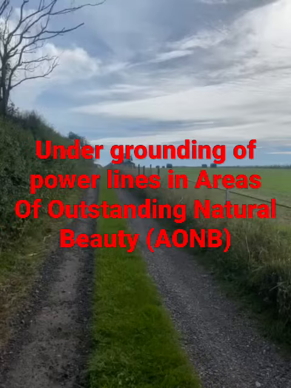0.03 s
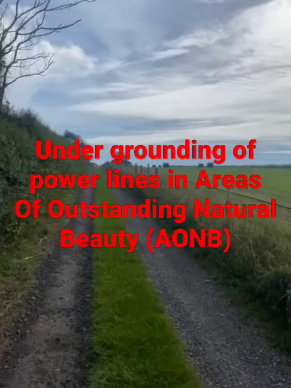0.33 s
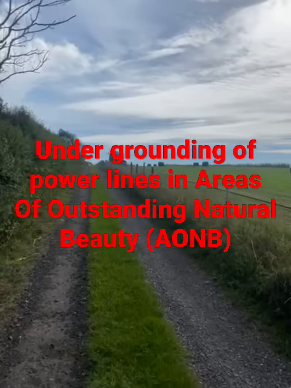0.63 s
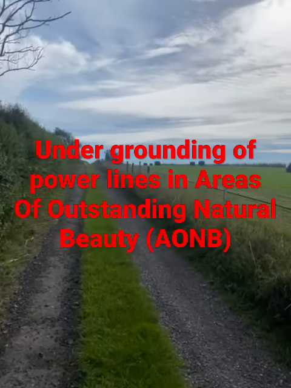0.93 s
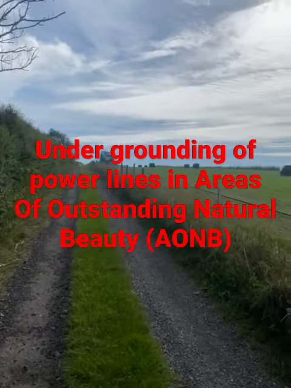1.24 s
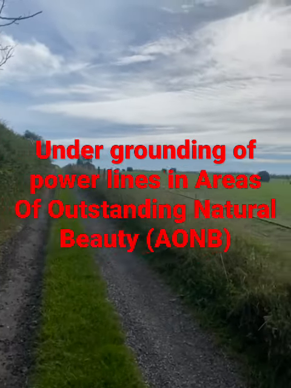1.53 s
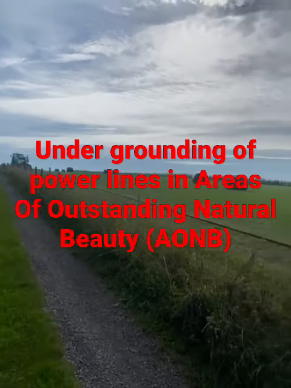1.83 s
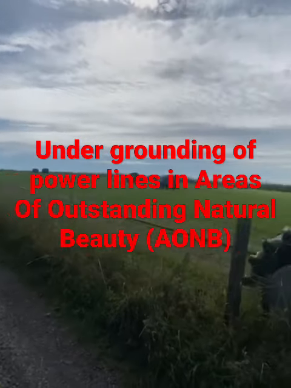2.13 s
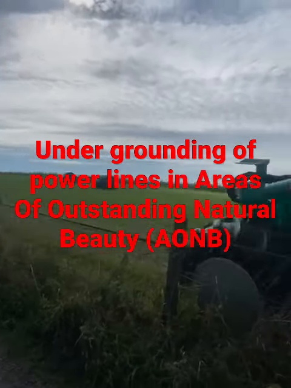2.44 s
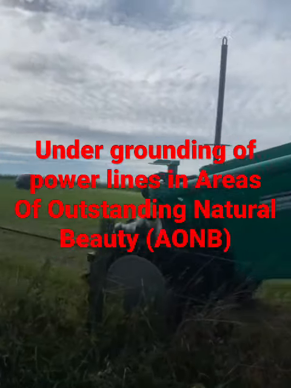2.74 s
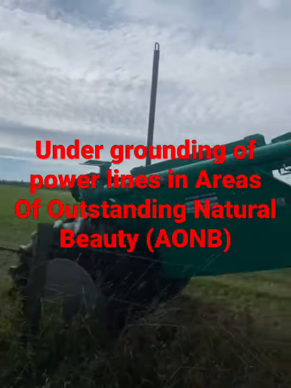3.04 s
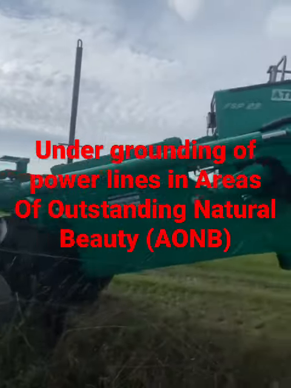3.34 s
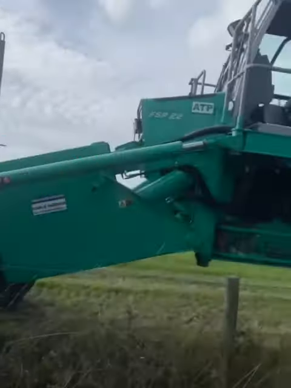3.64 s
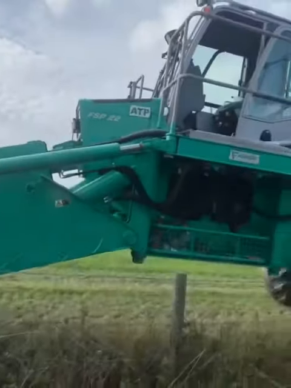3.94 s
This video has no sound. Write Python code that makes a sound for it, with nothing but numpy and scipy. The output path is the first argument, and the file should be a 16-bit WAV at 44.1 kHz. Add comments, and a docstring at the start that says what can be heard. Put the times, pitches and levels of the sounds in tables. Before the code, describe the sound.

A big diesel engine drones at constant speed in open farmland, its fan roaring and whining over faint wind. Two tiny ticks sound close by, then the engine becomes boomier and duller, with a fast rasp coming through.

```python
"""Beside a farm track, a big diesel machine runs at a steady speed.
Its exhaust drones on the shaft orders and puffs at each firing; fan air roars in its housing; tones whine.
As the microphone turns towards it the roar dulls, the boom grows and a fast-turning part rasps through.
Two small ticks sound nearby, and faint wind lies underneath."""
import sys
import numpy as np
from scipy.fft import rfft, irfft, next_fast_len
from scipy.io import wavfile
from scipy.ndimage import map_coordinates

SR = 44100
rng = np.random.default_rng(int(sys.argv[2]) if len(sys.argv) > 2 else 0)


def wrap_up_sound(samples):
    """Save the sound to the file named by the first command line argument, as 16-bit audio."""
    columns = np.atleast_2d(samples).T
    # keep every value between -1 and 1, then stretch to whole-number steps
    tamed = np.clip(columns, -1, 1)
    steps = np.round(tamed * 32767).astype(np.int16)
    wavfile.write(sys.argv[1], SR, steps)


N = 176400
T = np.arange(N) / SR

# exhaust lines: shaft order, level/dB, gain when facing/dB, waver/dB
EXHAUST_ORDERS = [(3, -31, -1.2, 0.5), (4.5, -33, -2, 1.5), (6, -34.5, 6, 0.8), (9, -40, -7, 4),
                  (12, -37, 10, 1.5)]
# exhaust directness: t/s, facing/0-1
FACING = [(1.9, 0.02), (2.2, 0.93), (2.95, 0.9), (3.2, 0.74), (3.5, 0.55), (3.75, 0.98), (4, 0.7)]
# rumble envelope: t/s, level/dB
RUMBLE_LEVEL = [(0, -24.5), (.5, -23.5), (1.1, -25.2), (1.7, -24.8), (2.4, -24), (3, -23.5), (3.3, -23.5),
                (3.6, -25.8), (4, -20.5)]
# rumble spectrum: f/Hz, level/dB
RUMBLE_SPECTRUM = [(35, -43), (55, -15.5), (80, -8), (120, -2.5), (155, -6.5), (195, -5), (212, 0),
                   (255, -0.5), (285, -4), (315, -9.5), (400, -7), (480, -26), (900, -47.5)]
def exhaust(shaft_hz=23.17, drift=0.0019, firings_per_turn=3, puff_depth=0.26):
    """Engine orders drone over a rumble that swells at each firing."""
    turns = np.cumsum(shaft_hz * (1 + drift * wobble(3.01))) / SR
    facing = curve(FACING)
    drone = 0
    for order, db, facing_db, waver_db in EXHAUST_ORDERS:
        rms = amp(db + facing_db * facing + waver_db * wobble(9))
        drone += np.sqrt(2) * rms * np.sin(2 * np.pi * (order * turns + rng.random()))
    puffs = 1 + puff_depth * np.cos(2 * np.pi * firings_per_turn * turns)
    return drone + amp(curve(RUMBLE_LEVEL)) * rush(RUMBLE_SPECTRUM, puffs)


# block envelope: t/s, level/dB
BLOCK_LEVEL = [(0, -27), (.5, -27), (1.1, -24.5), (1.7, -25), (2.2, -23.5), (2.6, -25), (3.1, -23),
               (3.6, -26), (4, -25.5)]
# block spectrum: f/Hz, level/dB
BLOCK_SPECTRUM = [(150, -21), (300, -1), (410, -2), (470, 0.5), (600, 1.5), (850, -4), (1300, -6.5),
                  (2200, -15), (3200, -20.5), (6000, -41)]
def engine_block():
    """The block radiates a low, broad roar."""
    return amp(curve(BLOCK_LEVEL) + 0.13 * wobble(11)) * rush(BLOCK_SPECTRUM)


# fan envelope: t/s, level/dB
FAN_LEVEL = [(0, -29.5), (.45, -25), (.85, -25), (1.15, -23.5), (1.5, -22.5), (1.9, -24.5), (2.2, -22),
             (2.45, -22), (2.8, -25.5), (3.2, -28), (4, -30)]
# fan spectrum: f/Hz, level/dB
FAN_SPECTRUM = [(400, -27), (700, -11.5), (900, -0.5), (1200, 2), (1400, -1.5), (1700, 0), (1900, -2),
                (2150, -3.5), (2500, -8.5), (3200, -16), (5000, -51)]
# housing resonances: f/Hz, width/Hz, lift/dB
HOUSING_MODES = [(1105, 220, 1.5), (1522, 28, 4), (2086, 27, 4.5)]
def fan():
    """Rushing fan air rings in its housing."""
    level = amp(curve(FAN_LEVEL) + 0.47 * wobble(15))
    flicker = amp(0.7 * wobble(120))
    return level * rush(FAN_SPECTRUM, flicker, HOUSING_MODES)


# hum envelope: t/s, level/dB
HUM_LEVEL = [(0, -29), (.85, -29.5), (1.4, -30), (2.15, -28), (2.55, -34.5), (3, -37.5), (3.5, -30),
             (4, -42)]
# lower whine envelope: t/s, level/dB
LOW_WHINE_LEVEL = [(.25, -45), (.47, -31), (.8, -31.5), (1.1, -37), (1.5, -39), (1.75, -31.5),
                   (2.25, -29.5), (2.5, -41), (3.1, -53)]
# upper whine envelope: t/s, level/dB
HIGH_WHINE_LEVEL = [(.1, -46), (.7, -34.5), (1.2, -29.5), (1.5, -35.5), (2, -36), (2.3, -35), (2.55, -41),
                    (2.74, -30), (2.95, -36), (3.3, -45), (4, -41)]
# beamed tones: f/Hz, level/dB, peak t/s, beam sigma/s, off-beam loss/dB, flutter share/0-1
BEAMED_TONES = [(226.4, -23, 3.29, 0.11, 27, 0.3), (381.9, -30.5, 0.23, 1.04, 5.5, 0.23),
                (712, -40, 2.6, 1, 6, 0.25), (762.6, -36.5, 1.4, 1.07, 9, 0.12),
                (897, -37.5, 1.2, 0.72, 13, 0.3), (1040, -36, 1.84, 0.75, 22, 0.74),
                (1516, -38, 1.8, 1.3, 10, 0.57), (1615, -40, 1.6, .9, 16, 0.6),
                (2094, -43, 1.5, 1.2, 14, 0.6)]
def whine():
    """A hum and two whines that take turns; other tones swell as the microphone crosses their beams."""
    out = amp(curve(HUM_LEVEL)) * tone(hz=356.4, flutter_share=0.022)
    out += amp(curve(LOW_WHINE_LEVEL)) * tone(hz=1089, flutter_share=0.088)
    out += amp(curve(HIGH_WHINE_LEVEL)) * tone(hz=1142, flutter_share=0.2)
    for hz, db, peak_s, sigma_s, loss_db, flutter_share in BEAMED_TONES:
        off_beam = 1 - np.exp(-.5 * ((T - peak_s) / sigma_s) ** 2)
        out += amp(db - loss_db * off_beam) * tone(hz, flutter_share)
    return out


def tone(hz, flutter_share, drift=0.00253):
    """A wandering tone at rms 1; a share of its power flutters in the moving air."""
    flutter_hz = 21.93 * (hz / 1000) ** .6
    steady = np.sqrt(2 * (1 - flutter_share))
    flutter = np.sqrt(flutter_share) * (wobble(flutter_hz) + 1j * wobble(flutter_hz))
    cycles = np.cumsum(hz * (1 + drift * wobble(8))) / SR
    return np.real((steady + flutter) * np.exp(2j * np.pi * (cycles + rng.random())))


# hiss envelope: t/s, level/dB
HISS_LEVEL = [(0, -35), (.3, -36.5), (.5, -35.5), (.9, -34.5), (1.15, -36.3), (1.4, -34.5), (1.7, -36),
              (2.15, -33), (2.5, -36), (3, -38), (4, -38.3)]
# hiss spectrum: f/Hz, level/dB
HISS_SPECTRUM = [(1500, -29), (2700, 0), (3300, 0), (4100, 1.5), (5200, -1.5), (6500, -7.5), (8000, -10.5),
                 (9700, -18.5), (11700, -38)]
# top treble envelope: t/s, level/dB
TREBLE_LEVEL = [(0, -52), (1, -48.5), (1.8, -55), (2.3, -44.5), (3, -45), (4, -43.5)]
# top treble spectrum: f/Hz, level/dB
TREBLE_SPECTRUM = [(4000, -10), (6500, 0.5), (8000, -2), (9700, -7), (11300, -8), (12000, -29)]
def hiss():
    """Two bands of hiss flicker above the roar."""
    lower = amp(curve(HISS_LEVEL) + .5 * wobble(13)) * rush(HISS_SPECTRUM)
    upper = amp(curve(TREBLE_LEVEL) + 1.3 * wobble(12)) * rush(TREBLE_SPECTRUM)
    return lower + upper


# rasps in each turn: place/turns, relative level/dB, sigma/turns
RASPS = [(.01, -8, 0.081), (.17, -5, .08), (.41, -8.5, 0.065)]
# clatter envelope: t/s, level/dB
CLATTER_LEVEL = [(0, -70), (1.9, -47), (2.7, -41), (3.3, -38.5), (4, -37)]
# clatter spectrum: f/Hz, level/dB
CLATTER_SPECTRUM = [(1000, -16), (2500, 9.5), (3800, -1), (5200, 2), (7000, -2), (9000, -11),
                    (11700, -13.5)]
def clatter(turn_hz=28.35):
    """A fast-turning part rasps three times a turn, never quite equally."""
    gate = 0
    for place, db, sigma in RASPS:
        offset_turns = (T * turn_hz - place + .5) % 1 - .5
        gate += amp(db) * np.exp(-.5 * (offset_turns / sigma) ** 2)
    unevenness = amp(1.9 * wobble(40))
    return amp(curve(CLATTER_LEVEL)) * rush(CLATTER_SPECTRUM, gate * unevenness)


# snaps, the first two heard as one tick: t/s, level/dB
SNAPS = [(.825, -28), (0.8274, -24.5), (1.931, -22)]
# snap spectrum: f/Hz, level/dB
SNAP_SPECTRUM = [(3000, -25), (7000, -6), (9000, 0), (12000, -1)]
def ticks(snap_decay_s=.0007, scrape_decay_s=.008, scrape_db=-15):
    """Tiny dry snaps close by, each trailing a faint scrape."""
    envelope = 0
    for onset_s, db in SNAPS:
        age_s = np.abs(T - onset_s)
        snap = np.exp(-age_s / snap_decay_s)
        scrape = amp(scrape_db) * np.exp(-age_s / scrape_decay_s)
        envelope += amp(db) * (T >= onset_s) * (snap + scrape)
    return coloured(envelope * rng.standard_normal(N), SNAP_SPECTRUM)


# wind spectrum: f/Hz, level/dB
WIND_SPECTRUM = [(5, -12), (15, -7), (40, -13), (120, 5), (400, -40)]
def wind(level_db=-51, gust_db=2.5):
    """Wind makes a faint low flutter at the microphone."""
    return amp(level_db + gust_db * wobble(4)) * rush(WIND_SPECTRUM)


def amp(db):
    """Decibels to gain."""
    return 10 ** (np.asarray(db) / 20)


def unit(x):
    """x at rms 1."""
    return x / np.sqrt(np.mean(x ** 2) + 1e-20)


def curve(rows):
    """(t/s, value) points joined by straight lines."""
    return np.interp(T, *np.transpose(rows))


def wobble(rate_hz):
    """Smooth random curve at rms 1, rate_hz knots a second."""
    return unit(map_coordinates(rng.standard_normal(2000), [T * rate_hz + 3], mode="wrap"))


def filtered(x, gain):
    """x through a frequency-dependent gain."""
    size = next_fast_len(N + 8192)
    return irfft(rfft(x, size) * gain(np.fft.rfftfreq(size, 1 / SR)), size)[:N]


def coloured(x, spectrum, peaks=()):
    """x through a (f/Hz, level/dB) spectrum with resonant lifts."""
    hz, db = np.transpose(spectrum)

    def gain(f):
        lift_db = sum(lift / (1 + (2 * (f - centre) / width) ** 2) for centre, width, lift in peaks)
        return amp(np.interp(np.log(f + 1), np.log(hz), db) + lift_db)
    return filtered(x, gain)


def rush(spectrum, gate=1, peaks=()):
    """Gated noise through a spectrum, at rms 1."""
    return unit(coloured(gate * rng.standard_normal(N), spectrum, peaks))


def scene():
    """Machine, ticks and wind, in mono."""
    machine = exhaust() + whine() + engine_block() + fan() + hiss() + clatter()
    return (machine + ticks() + wind())[None]


def record(dry):
    """Abrupt start and a hard band limit."""
    start_s, top_hz = .035, 11750
    return filtered(dry[0] * (T >= start_s), lambda hz: hz < top_hz)[None]


dry = scene()
out = record(dry)
wrap_up_sound(out)
```